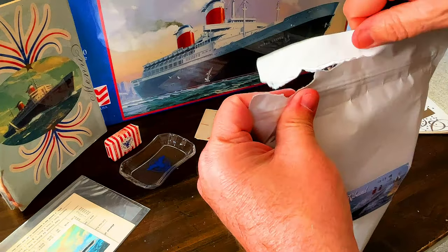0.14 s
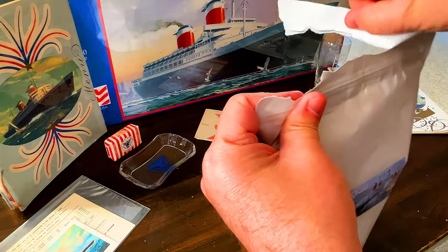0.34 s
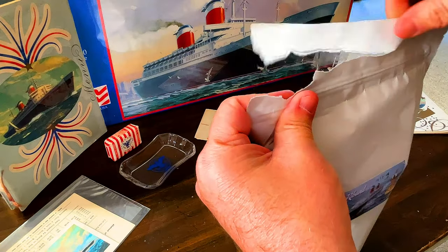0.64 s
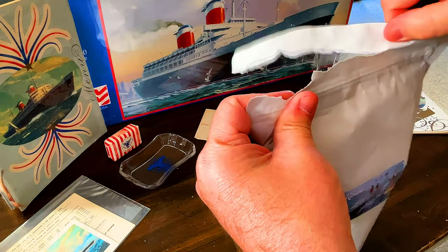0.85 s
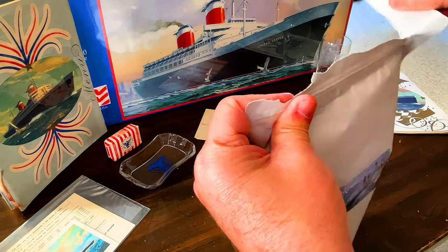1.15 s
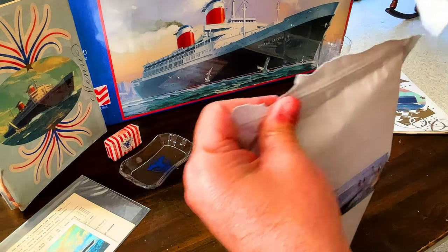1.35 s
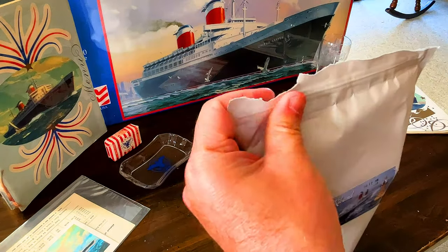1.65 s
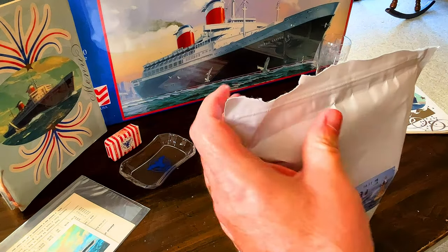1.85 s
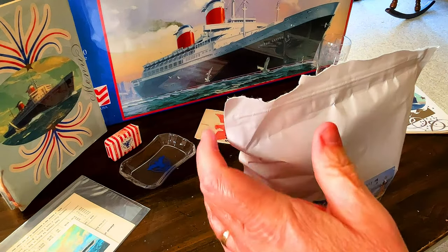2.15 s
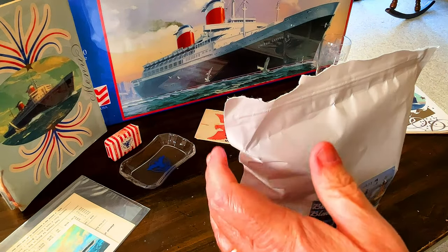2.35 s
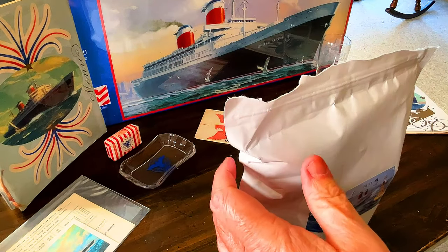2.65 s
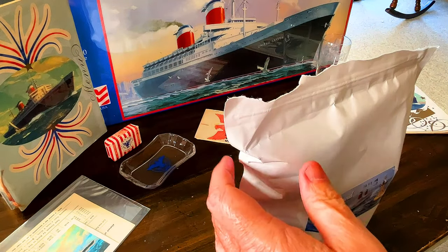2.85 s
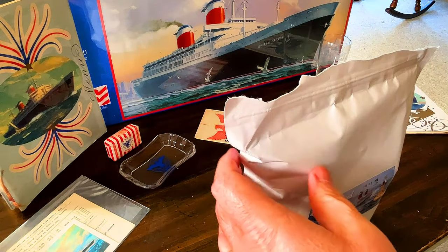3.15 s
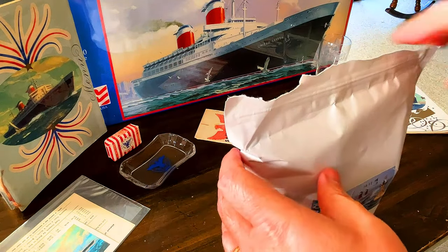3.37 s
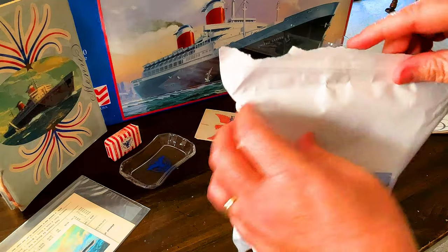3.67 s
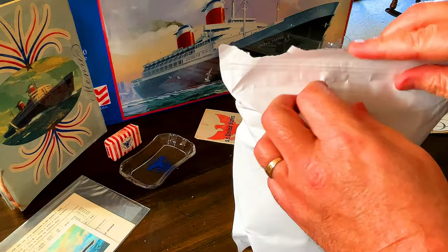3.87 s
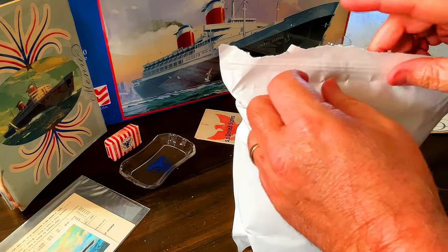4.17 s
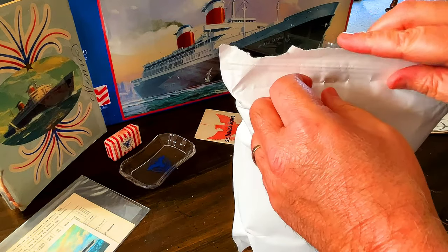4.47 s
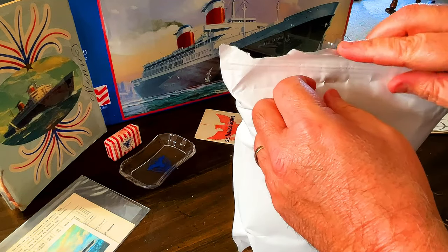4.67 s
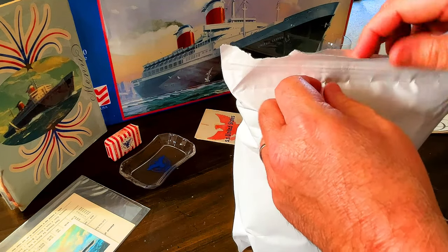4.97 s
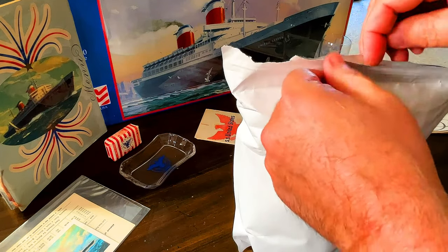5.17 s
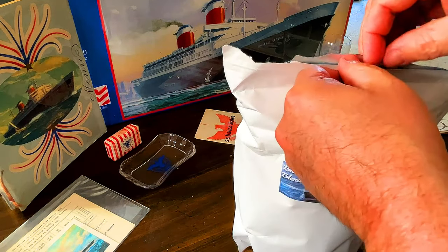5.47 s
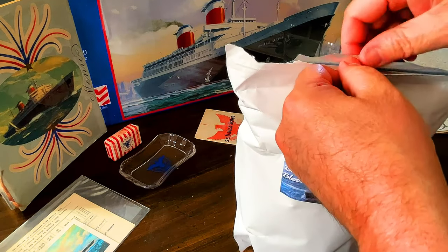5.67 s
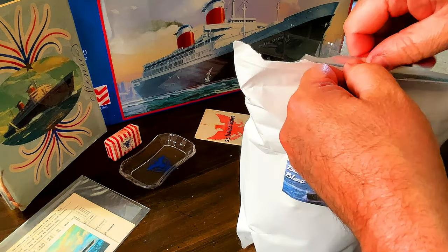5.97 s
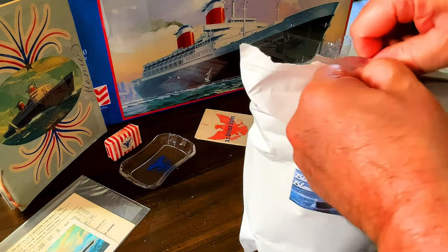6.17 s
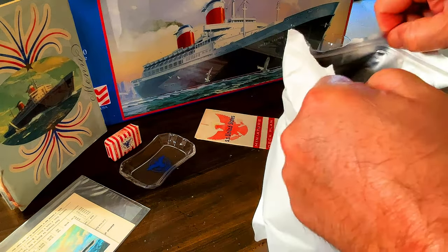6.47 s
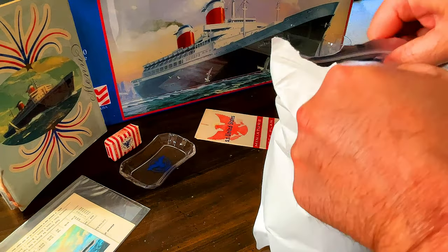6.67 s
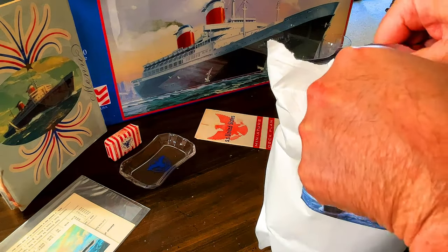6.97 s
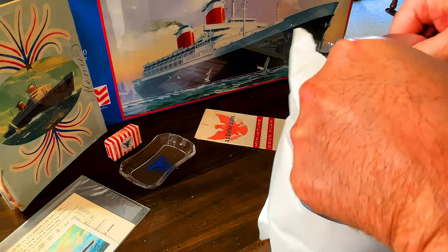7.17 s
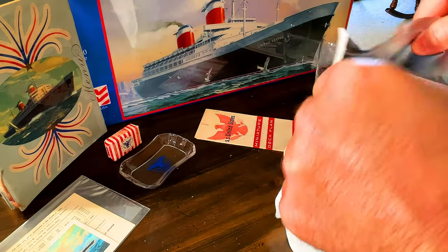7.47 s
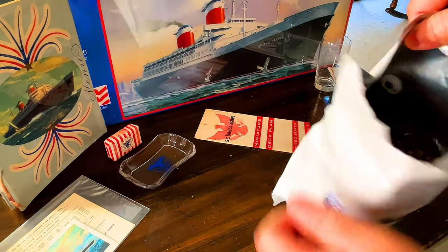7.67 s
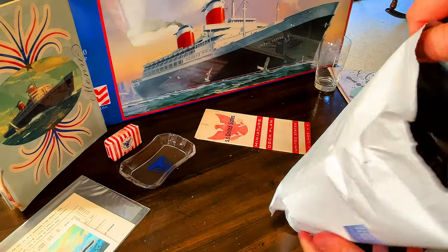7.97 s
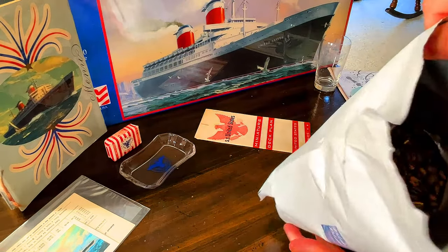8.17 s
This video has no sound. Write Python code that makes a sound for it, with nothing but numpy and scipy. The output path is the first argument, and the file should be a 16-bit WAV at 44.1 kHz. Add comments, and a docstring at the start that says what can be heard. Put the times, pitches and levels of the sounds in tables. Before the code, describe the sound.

Very close to the microphone in a small, fairly dry room, a strip is torn from a stiff foil-lined bag in short, gritty rips with sharp snaps and hollow booms. After a near-silent pause with faint finger scuffs, the bag is grabbed with a loud crackle, rubbed and pinched, then pried open with clusters of bright snaps and crinkles. A low rumble swells and sinks faintly underneath.

```python
"""Over a low rumble and a faint hiss a crease crackles, then hands tear the strip off a foil-lined coffee bag.
The tear is a stream of tiny fractures, drawn as random clicks and filtered to the colour of the laminate.
The stiff sheet buckles with sharp snaps that also thump the hollow bag; tugs make the bag's air boom.
Later the fingers slide over the bag and pry its seal open: friction noise in the panel's resonances.
All is close up, in a small room of diffuse reflections."""
import sys
import numpy as np
from scipy import signal
from scipy.fft import rfft, irfft
from scipy.io import wavfile

SR = 44100
rng = np.random.default_rng(int(sys.argv[2]) if len(sys.argv) > 2 else 0)


def store_wav(level_fs):
    """Save 16-bit WAV to argv[1]."""
    pcm = np.round(np.clip(np.atleast_2d(level_fs), -1, 1) * 32767)
    wavfile.write(sys.argv[1], SR, pcm.T.astype(np.int16))


N = 366762
TIME = np.arange(N) / SR   # t/s

# level of the low rumble before its trim: [t/s, level/dB]
RUMBLE_LEVEL = [(0.0, -61), (0.95, -57.5), (1.06, -49), (1.25, -45.5), (1.78, -60.5), (3.65, -44.5),
                (4.23, -48.5), (5.8, -41.5), (6.8, -53.5), (7.3, -45.5), (7.93, -69.5), (8.3, -52)]
# resonant hums in the rumble: [f/Hz, level/dB re the rumble's noise]
RUMBLE_HUMS = [(80, -6), (265, -9.5)]
# bends of the bag that crackle its creases: [t/s of hardest press, level/dB, rise/s, fall/s]
SQUEEZES = [(0.003, -22, 0.016, 0.018), (0.355, -29, 0.097, 0.37), (1.383, -15, 0.025, 0.016),
            (1.5, -40, 0.3, 0.25), (1.542, -14.5, 0.024, 0.031), (1.807, -48.5, 0.0043, 0.029),
            (3.557, -22, 0.053, 0.1), (4.075, -34, 0.11, 0.083), (5.184, -29, 0.09, 0.06),
            (6.43, -23.5, 0.24, 0.25), (6.796, -44, 0.015, 0.022), (6.87, -44, .15, 0.25),
            (7.202, -33, 0.14, 0.39), (7.3, -16.5, 0.043, 0.23), (7.814, -26, 0.055, 0.1),
            (8.041, -32.5, 0.025, 0.17), (8.091, -34, 0.046, 0.14)]
# buckles of the sheet: [t/s, nominal peak level/dB, panel resonance f/Hz, nominal treble level/dB re panel]
BUCKLES = [(0.296, -22, 2200, -29.5), (0.316, -11.5, 2780, -12.5), (0.412, -20, 1320, -22),
           (0.461, -25, 3170, -14), (0.495, -27, 2040, -35), (0.8043, -16, 1300, -15),
           (0.8523, -23.5, 2900, -42.5), (0.8935, -13.5, 1180, -34), (1.102, -6.5, 2900, -23),
           (1.203, -5.5, 2600, -21.5), (1.2239, -10, 3780, -3), (1.284, -2, 1380, -7),
           (1.3768, -6, 1030, -23), (1.5334, 0, 1350, -16), (1.623, -27.5, 1220, -39),
           (1.654, -20.5, 1760, -64), (3.5354, -3, 3400, -17.5), (3.551, 0, 4500, -9.5),
           (3.5777, -8.5, 1510, -16), (3.714, -8.5, 1400, -18.5), (4.0361, -0.5, 2320, -6),
           (4.0738, -15.5, 1260, -9.5), (4.109, -17.5, 1520, -14), (4.67, -40, 3530, -30),
           (4.744, -39, 2900, -8), (5.0093, -21, 1110, -37), (5.118, -6, 1080, -31),
           (5.1402, -17.5, 1450, -26), (5.1502, -9, 3430, -18.5), (5.163, -20.5, 2310, -18),
           (5.1751, -13, 2390, -18), (5.1828, -4, 3900, -21), (5.4601, -31.5, 6640, 6.5),
           (5.658, -24, 1190, -13), (5.8374, -9, 1980, -30), (6.1326, -22.5, 2520, 5.5),
           (6.145, -3.5, 3580, -8), (6.335, 1, 2020, -12), (6.3691, 1.5, 4060, -8),
           (6.3978, -1, 3940, -1.5), (6.4265, 2, 3620, -13.5), (6.4696, -12, 2140, -14),
           (6.4921, -0.5, 3570, -8), (6.5245, -7.5, 4230, -6), (6.878, -5.5, 4430, -13.5),
           (6.9399, -18, 1357, -37), (7.102, -26, 2060, -36), (7.1738, -5.5, 1600, -24.5),
           (7.185, 3, 3100, -15.5), (7.2908, -7.5, 1230, -27.5), (7.299, -8, 1140, -17),
           (7.3673, -4.5, 1290, -15.5), (7.39, -5.5, 7600, 2), (7.5385, -12.5, 2320, -41),
           (7.763, -22, 2130, -38.5), (7.799, -3, 2500, -14.5), (7.838, -10, 2100, -22),
           (8.0793, -12.5, 1540, -27), (8.1484, 0.5, 1900, -14.5)]
# tugs on the whole bag, whose air booms: [t/s, initial f/Hz, initial level/dB]
TUGS = [(0.319, 265, -13), (0.894, 230, -19), (1.049, 271, -14.5), (1.379, 151, -15.5), (1.539, 150.3, -16),
        (3.553, 247.7, -15), (4.04, 275, -17.5), (5.185, 220, -21), (6.881, 278, -23.5),
        (6.984, 301, -34.5)]
# runs of the tear through the strip: [start t/s, end t/s, level/dB at the start, run-out/s]
RIPS = [(0.326, 0.385, -20, 0.18), (0.931, 0.96, -36.5, 0.054), (0.966, 0.98, -16.5, 0.072),
        (1.004, 1.122, -17, 0.1), (1.17, 1.213, -38.5, 0.05), (1.233, 1.266, -18.5, 0.047),
        (1.286, 1.322, -32.5, .06), (1.353, 1.375, -24, 0.027)]
# finger strokes on the sheet: [start t/s, end t/s, rasp level/dB, fine hiss level/dB, panel resonance f/Hz]
STROKES = [(2.553, 2.63, -67, -99, 2900), (3.136, 3.35, -54.5, -75, 2700), (3.165, 3.274, -44.5, -45, 3920),
           (3.561, 3.769, -37.5, -43, 2120), (3.771, 4.01, -50, -56, 2970),
           (3.866, 3.903, -42.5, -42.5, 3150), (3.998, 4.117, -40, -41.5, 1450),
           (4.123, 4.179, -45.5, -34, 4500), (4.369, 4.392, -55, -59.5, 5000),
           (4.553, 4.586, -48.5, -81, 2860), (4.64, 5.019, -62, -83, 2650),
           (4.827, 4.935, -58, -61.5, 3300), (4.997, 5.143, -48.5, -52.5, 3970),
           (5.195, 5.284, -42.5, -42.5, 2640), (5.348, 5.358, -50.5, -59.5, 3500),
           (5.442, 5.556, -47, -53, 3180), (5.562, 5.586, -38, -41.5, 3500), (5.606, 5.921, -53, -59, 1340),
           (5.945, 6.06, -43.5, -49.5, 1300), (6.074, 6.176, -41, -49, 1290),
           (6.186, 6.313, -42.5, -54.5, 1220), (6.513, 6.673, -48, -52.5, 3420),
           (7.2, 7.372, -54, -42.5, 1500), (7.487, 7.685, -35.5, -44.5, 2470),
           (8.17, 8.315, -42, -50.5, 3200)]
# flat hand sliding over a thin pocket of air:
# [start t/s, end t/s, rasp level/dB, fine hiss level/dB, pocket resonance f/Hz, echo share, low edge f/Hz]
SLIDES = [(3.336, 3.555, -35, -36, 3610, 0.26, 150), (7.405, 7.49, -31.5, -38, 2500, 0.2, 1000),
          (7.676, 7.738, -34.5, -47, 2610, 0.28, 2010)]
# filter spectra of the rumble, sheet, thump, tear, foil treble and finger rasp: [f/Hz, level/dB]
RUMBLE_SPECTRUM = [(25, -19.5), (50, -4), (85, 1.5), (130, -6), (210, -13), (290, -10), (500, -32),
                   (900, -45), (16000, -83.5)]
SHEET_SPECTRUM = [(100, -16), (380, -7.5), (530, -19), (680, -2.5), (890, -12), (1170, 2), (2000, 2),
                  (3800, 1.5), (5200, -4), (8000, -17), (16000, -49)]
THUMP_SPECTRUM = [(35, -44.5), (70, -7), (130, 0.5), (230, -3.5), (370, -3.5), (530, -19), (1200, -63.5)]
TEAR_SPECTRUM = [(40, -36), (70, -20), (130, -6.5), (200, -2), (280, -5), (540, -26), (660, -15),
                 (900, -27), (1150, -10), (1450, -10.5), (2800, -7), (5100, -13), (11000, -10.5),
                 (16000, -24)]
TREBLE_SPECTRUM = [(2500, -22), (6000, 5), (9000, 2.5), (10800, 2.5), (12500, -11.5), (16000, -12)]
RASP_SPECTRUM = [(380, -9), (550, -25.5), (700, -20), (880, -21.5), (1200, -2.5), (2600, -1), (4000, -2),
                 (5500, -7.5), (9000, -49)]
# reverberation of the room: [f/Hz, time to decay by 60 dB/s]
ROOM_DECAY = [(150, 0.35), (1000, 0.035), (3500, 0.23), (8000, 0.12), (14000, 0.18)]

CUTOFF_HZ = 16000
RUMBLE_TRIM_DB, HISS_DB = -0.5, -96.5
# thump re panel at a nominal 0 dB peak, and its loss per dB of peak: soft snaps sound hollower
THUMP_DB, THUMP_LOSS = -14.5, 0.56
RIP_ATTACK_S, RIP_SAG_DB_PER_S = 0.033, 35   # each rip bites quickly and weakens as the pull is spent
FIBRES_PER_S, FIBRE_DB = 220, -8.5   # tougher strands, and their level re the fractures


def from_db(db):
    """Logarithmic level: 20 dB is a factor of ten in amplitude."""
    return 10 ** (np.asarray(db) / 20)


def rms_one(x):
    """Power normalisation: scale to rms 1."""
    return x / np.sqrt(np.mean(x ** 2) + 1e-20)


def burst_level(x):
    """Energy normalisation: the burst's energy, spread over 10 ms, has rms 1."""
    return x / np.sqrt(np.sum(x ** 2) / (.01 * SR))


def gain_curve(rows):
    """Level envelope: dB interpolated linearly in time, silent outside the span."""
    times, levels_db = np.array(rows).T
    inside = (TIME >= times[0]) & (TIME <= times[-1])
    return from_db(np.interp(TIME, times, levels_db)) * inside


def at_hz(points, hz):
    """Interpolation of a spectrum on a logarithmic frequency axis."""
    points = np.array(points)
    return np.interp(np.log(hz + 1), np.log(points[:, 0]), points[:, 1])


def colour(x, spectrum, size=2048):
    """Minimum-phase filtering: folding the cepstrum makes the given spectrum causal."""
    gains = from_db(at_hz(spectrum, np.fft.rfftfreq(size, 1 / SR)))
    cepstrum = irfft(np.log(gains))
    cepstrum[1:size // 2] *= 2
    cepstrum[size // 2 + 1:] = 0
    impulse_response = irfft(np.exp(rfft(cepstrum)))
    return signal.oaconvolve(x, impulse_response)[:len(x)]


def fine(x, treble_db, tilt=0.2):
    """Spectral tilt of the foil's treble: above 6 kHz it tilts with the given treble level."""
    tilted = [(hz, db + tilt * treble_db * max(np.log2(hz / 6000), 0)) for hz, db in TREBLE_SPECTRUM]
    return colour(x, tilted)


def resonance(x, hz, width_hz):
    """Damped resonator: a two-pole band-pass with a peak gain of about 1."""
    r = np.exp(-np.pi * width_hz / SR)
    zeros = np.array([1, 0, -1]) * (1 - r * r) / 2
    poles = [1, -2 * r * np.cos(2 * np.pi * hz / SR), r * r]
    return signal.lfilter(zeros, poles, x)


def highpass(x, hz):
    """Second-order high-pass filtering."""
    return signal.sosfilt(signal.butter(2, hz, "high", fs=SR, output="sos"), x)


def drift(rate):
    """Random modulation about 0: normal values, rate per second, joined by straight lines."""
    return np.interp(TIME * rate, np.arange(N), rng.standard_normal(N))


def grains(per_s, spread_db, clump_db):
    """Random point process: clicks of either sign and uneven size, swelling in clumps."""
    born = rng.random(N) < per_s / SR
    size_db = spread_db * np.minimum(rng.exponential(1, N), 3.5)
    return born * rng.choice([-1, 1], N) * from_db(size_db + clump_db * drift(260))


def swell(start_s, end_s, rise_s, fall_s):
    """Force envelope: builds from nothing over rise_s, holds, and is let go over fall_s."""
    away = np.maximum((start_s - TIME) / rise_s, (TIME - end_s) / fall_s)
    return (1 - np.clip(away, 0, 1)) ** 3


def delayed(x, lag_s):
    """Propagation delay by interpolation; the lag may vary in time."""
    t = np.arange(len(x)) / SR
    return np.interp(t - lag_s, t, x, left=0)


def add(track, s, sound):
    """Superposition: mix a sound in at time s."""
    at = int(s * SR)
    track[at:at + len(sound)] += sound[:N - at]


def hiss():
    """White noise: the microphone's faint, steady hiss."""
    return from_db(HISS_DB) * rng.standard_normal(N)


def rumble(width_hz=18):
    """Filtered noise: a dull rumble with narrow-band, wavering hums, all swelling and sinking."""
    hum_noise, low_noise = rng.standard_normal((2, N))
    hums = np.zeros(N)
    for hz, db in RUMBLE_HUMS:
        narrow = resonance(resonance(hum_noise, hz, width_hz), hz, width_hz)
        hums += from_db(db) * rms_one(narrow)
    level = gain_curve(RUMBLE_LEVEL) * from_db(RUMBLE_TRIM_DB + 1.2 * drift(18))
    return level * (rms_one(colour(low_noise, RUMBLE_SPECTRUM)) + hums)


def stroke(length_s, rasp_db, hiss_db, panel_hz):
    """Sliding friction: noise excites the touched panel's resonance, with a finer contact hiss."""
    t = np.arange(int(length_s * SR)) / SR
    # the skin catches on small creases, which crackle through the smooth friction
    catches = (rng.random(len(t)) < 120 / SR) * rng.normal(0, 10, len(t))
    rasp_noise, contact_noise = rng.standard_normal((2, len(t))) + catches
    rasp = colour(rasp_noise, RASP_SPECTRUM)
    # the free span changes under the moving finger, so its resonance glides
    glide = rng.normal(0, .2)
    gliding_t = t * (1 + glide * (t / length_s - 1) / 2)
    ringing = resonance(rasp, panel_hz, .22 * panel_hz)
    rasp = rasp + 1.8 * np.interp(gliding_t, t, ringing)
    # louder hiss is given more top treble, softer hiss less
    top_db = np.clip(hiss_db + 43.5, -10, 10)
    contact = colour(fine(contact_noise, hiss_db - rasp_db), [(10500, 0.0015), (13000, top_db)])
    sound = from_db(rasp_db) * rms_one(rasp) + from_db(hiss_db) * rms_one(contact)
    # a bounce between bag and moving hand sweeps a hollow comb colour through the stroke
    gap_s = rng.uniform(.0006, .0014) * (1 + rng.normal(0, .5) * t)
    soft_ends = signal.windows.tukey(len(t), min(.06 / length_s, 1))
    pressure = np.sin(np.pi * t / length_s) ** .5 * soft_ends
    return (sound + .3 * delayed(sound, gap_s)) * pressure


def fidget():
    """Intermittent friction: the holding fingers shift in faint scuffs with silence between."""
    scuff = stroke(N / SR, rasp_db=-78, hiss_db=-96.5, panel_hz=2900)
    return scuff * np.maximum(drift(11), 0)[:len(scuff)] ** 2


def crumple():
    """Crackling noise: small creases give way with a papery crunch and the hollow booms along."""
    creases = grains(per_s=2000, spread_db=1.5, clump_db=5.5)
    sheet = colour(creases, SHEET_SPECTRUM)
    crunch = rms_one(sheet + 2.2 * resonance(sheet, 1290, 450))
    hollow = from_db(-4.5) * rms_one(colour(creases, THUMP_SPECTRUM))
    press = sum(from_db(db) * swell(s, s, rise_s, fall_s) for s, db, rise_s, fall_s in SQUEEZES)
    return press * (crunch + hollow)


def snap(peak_db, hz, treble_db, size=6000, count=400):
    """Buckling instability: a crack, panel waves and a push on the bag's air; count samples lead."""
    t = (np.arange(size) - count) / SR
    rattle, fizz, flap = rng.standard_normal((3, size))
    impulse = 1. * (t == 0)

    def fading(t60_s, rise_db):
        """Exponential envelope: a short noise rise ahead of the crack, a decay after it."""
        return np.where(t < 0, from_db(rise_db + 60 * t / 0.021), from_db(-60 * t / t60_s))

    panel = colour(rattle * fading(t60_s=0.029, rise_db=-14), SHEET_SPECTRUM)
    panel = burst_level(panel + 2.2 * resonance(panel, hz, hz / 2))
    treble = burst_level(fine(fizz * fading(t60_s=0.025, rise_db=-18.5), treble_db))
    # the hollow's pitch changes with every dent in the bag
    thump = colour(flap * (t >= 0) * from_db(-60 * t / 0.049), THUMP_SPECTRUM)
    thump = burst_level(thump + 2 * resonance(thump, rng.uniform(130, 260), 34))
    thump_gain = from_db(THUMP_DB - THUMP_LOSS * peak_db)
    ring = panel + from_db(treble_db + 3.0) * treble + thump_gain * thump
    crack = colour(impulse, SHEET_SPECTRUM) + from_db(treble_db + 8.5) * fine(impulse, treble_db)
    crack = crack / np.abs(crack).max()
    # less treble gives the whole snap a softer edge
    softness = [(4500, 0), (CUTOFF_HZ, min(treble_db + 14.5, 0))]
    return from_db(peak_db) * colour(crack + from_db(-14.0) * ring, softness), count / SR


def snaps():
    """Superposition of impulsive events: every buckle, with a short noise rise ahead of its crack."""
    out = np.zeros(N)
    for s, *shape in BUCKLES:
        sound, lead_s = snap(*shape)
        add(out, s + .0005 - lead_s, sound)
    return out


def tugs(t60_s=0.087, sag_per_s=7, rise_s=0.0044):
    """Damped oscillation: the bag's wide faces swing and sink in pitch as they slacken."""
    out, t = np.zeros(N), TIME[:SR // 2]
    for s, hz, peak_db in TUGS:
        turns = hz * np.cumsum(np.exp(-sag_per_s * t)) / SR
        envelope = np.minimum(t / rise_s, 1) * from_db(peak_db - 60 * t / t60_s)
        add(out, s, np.sin(2 * np.pi * turns) * envelope)
    return out


def tear():
    """Fracture noise: thousands of tiny breaks a second shake the bag; tougher strands snap in the sheet."""
    fractures = grains(per_s=12000, spread_db=2.6, clump_db=1.7)
    fibres = grains(per_s=FIBRES_PER_S, spread_db=3, clump_db=2)
    pull = np.zeros(N)
    for start, end, db, run_out_s in RIPS:
        sag_db = RIP_SAG_DB_PER_S * np.maximum(TIME - start, 0)
        pull += swell(start, end, RIP_ATTACK_S, run_out_s) * from_db(db - sag_db)
    parting = rms_one(colour(fractures, TEAR_SPECTRUM))
    strands = from_db(FIBRE_DB) * rms_one(colour(fibres, SHEET_SPECTRUM))
    return pull * (parting + strands)


def slide(length_s, rasp_db, hiss_db, pocket_hz, echo, low_hz):
    """Comb filtering: two bounces in the pocket give hollow, even bands; a taut sheet loses its lows."""
    x = highpass(stroke(length_s, rasp_db, hiss_db, pocket_hz), low_hz)
    return x + echo * (delayed(x, 1 / pocket_hz) + delayed(x, 2 / pocket_hz))


def rub(lead_s=0.02, trail_s=0.017):
    """Modulated friction: strokes and slides ease in and out while the grip wavers."""
    out = np.zeros(N)
    for rows, gesture in (STROKES, stroke), (SLIDES, slide):
        for start, end, *tone in rows:
            add(out, start - lead_s, gesture(end - start + lead_s + trail_s, *tone))
    return out * from_db(1.6 * drift(45) + 0.7 * drift(670))


def room(x, wet_db, size=22050):
    """Diffuse reverberation: reflections decay exponentially, at their own pace in each band."""
    t, tail = np.arange(size) / SR, np.zeros(size)
    edges = np.geomspace(70, 17000, 9)
    for low, high in zip(edges, edges[1:]):
        band_filter = signal.butter(2, [low, high], "band", fs=SR, output="sos")
        band = signal.sosfilt(band_filter, rng.standard_normal(size))
        tail += band * from_db(-60 * t / at_hz(ROOM_DECAY, np.sqrt(low * high)))
    tail *= np.minimum(t / .008, 1)   # reflections build up over 8 ms
    return from_db(wet_db) * signal.oaconvolve(x, tail / np.sqrt(np.sum(tail ** 2)))[:N]


def scene():
    """Superposition: the bag close to the microphone, its room and the background."""
    bag = crumple() + snaps() + tugs() + tear() + rub()
    add(bag, 0, fidget())
    return (bag + room(bag, wet_db=-17.5) + rumble() + hiss())[None]


def record(dry):
    """Band limiting and saturation: deep bass drops, the loudest cracks overload, the top is cut."""
    thinned = highpass(dry, 45)
    rounded = thinned / (1 + (thinned / 1.05) ** 4) ** .25
    top_cut = signal.ellip(10, .2, 80, CUTOFF_HZ, fs=SR, output="sos")
    return signal.sosfilt(top_cut, rounded)


dry = scene()
out = record(dry)
store_wav(out)
```